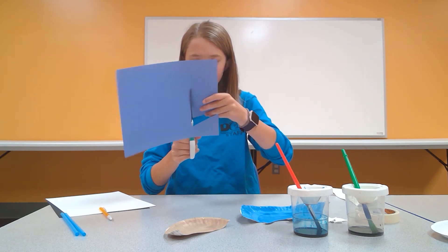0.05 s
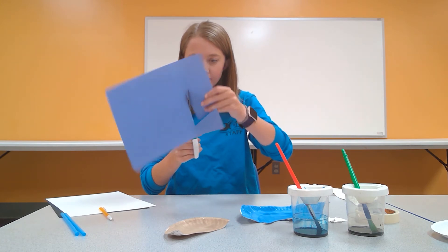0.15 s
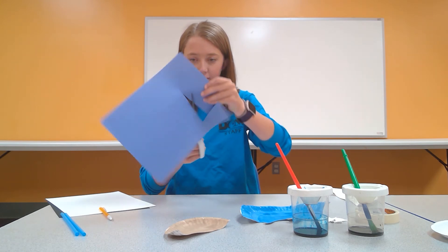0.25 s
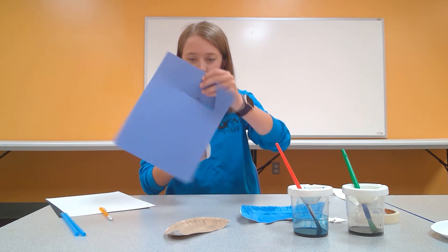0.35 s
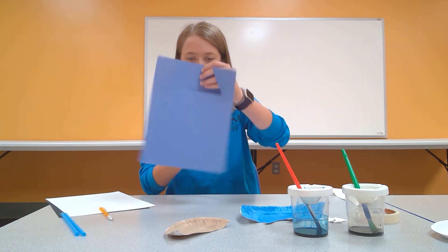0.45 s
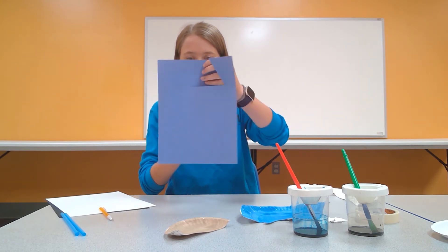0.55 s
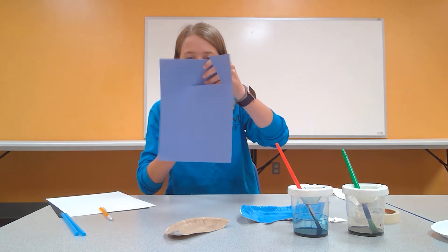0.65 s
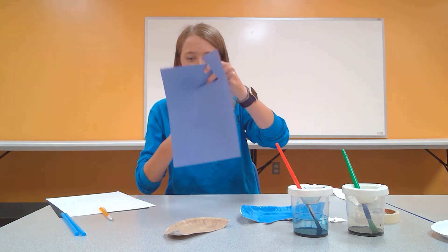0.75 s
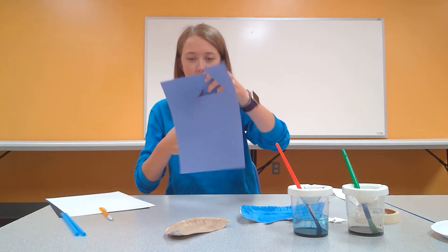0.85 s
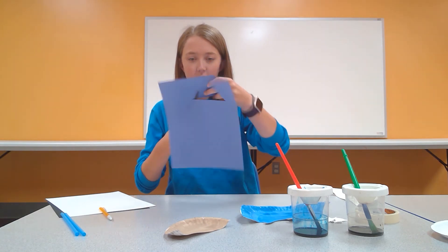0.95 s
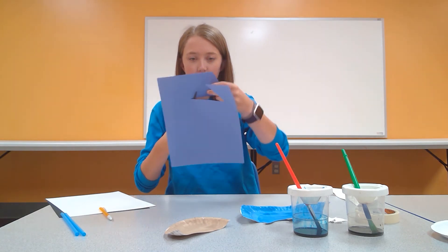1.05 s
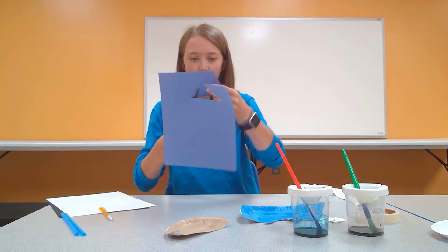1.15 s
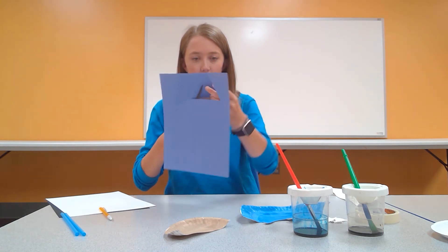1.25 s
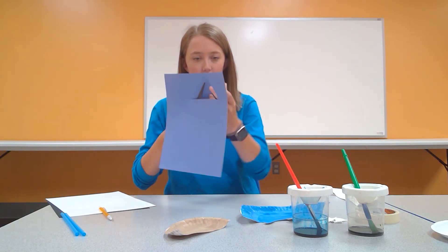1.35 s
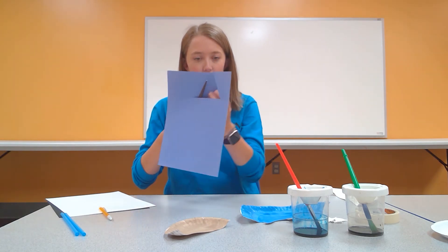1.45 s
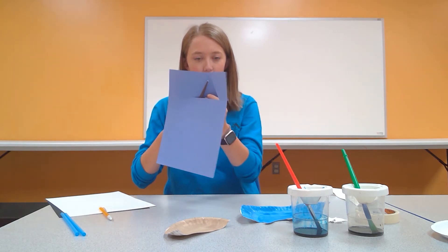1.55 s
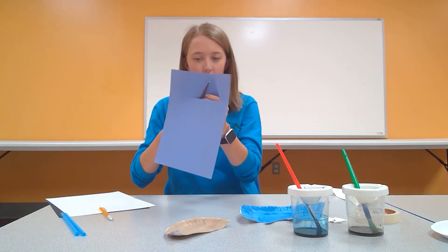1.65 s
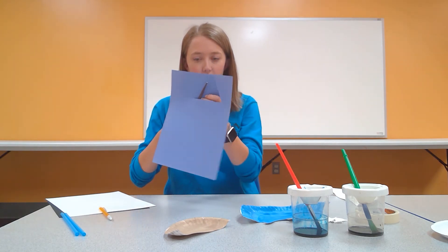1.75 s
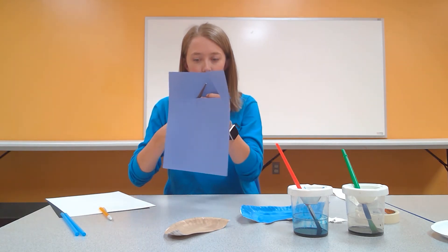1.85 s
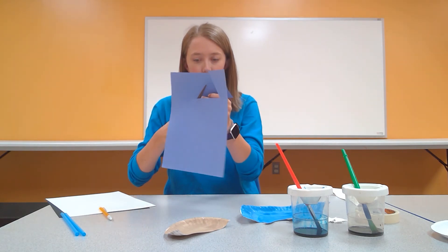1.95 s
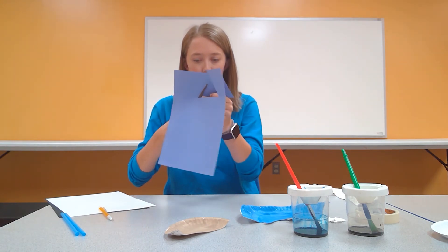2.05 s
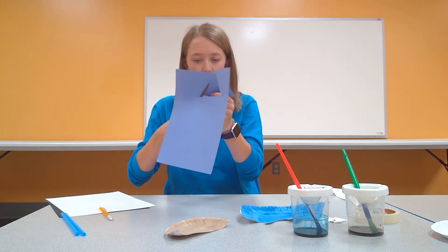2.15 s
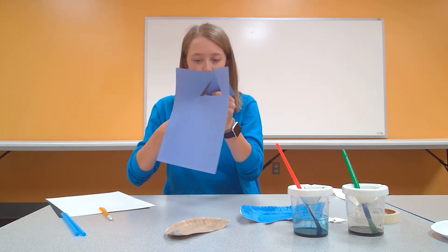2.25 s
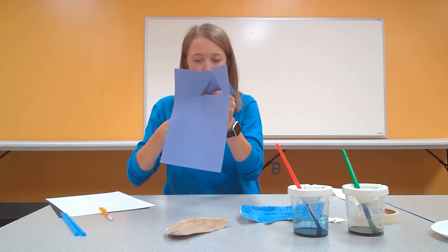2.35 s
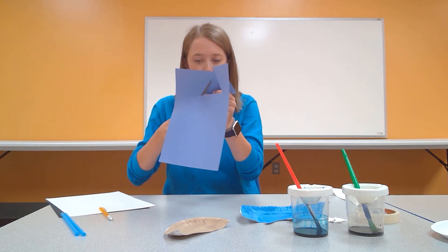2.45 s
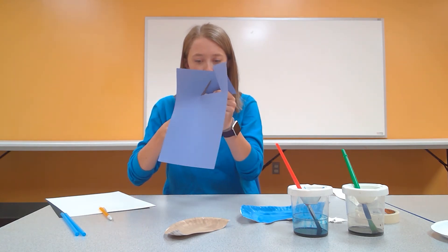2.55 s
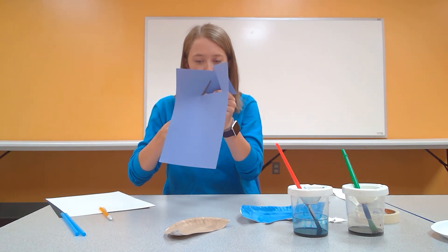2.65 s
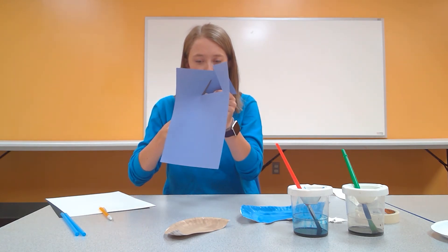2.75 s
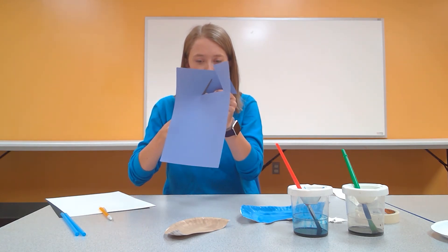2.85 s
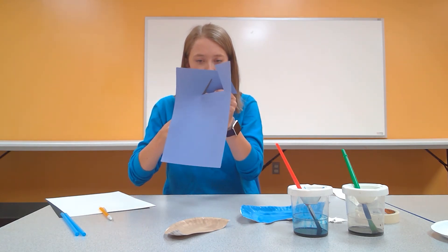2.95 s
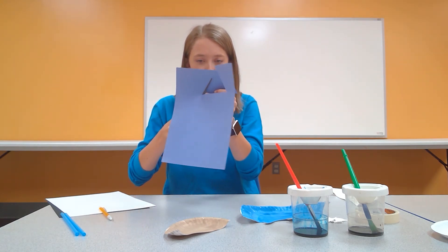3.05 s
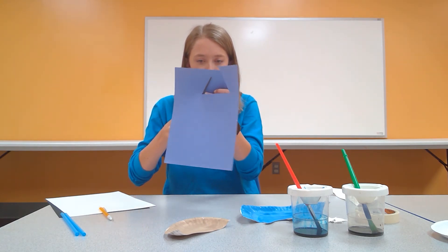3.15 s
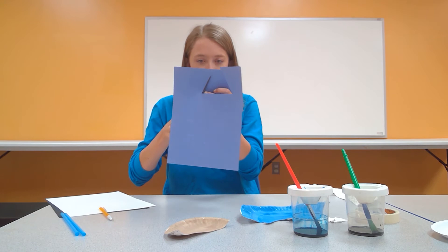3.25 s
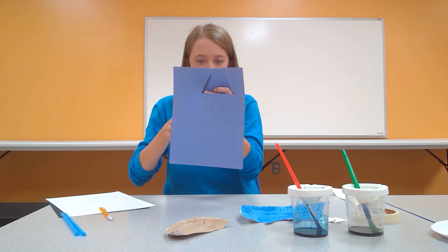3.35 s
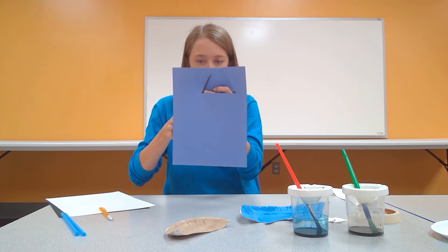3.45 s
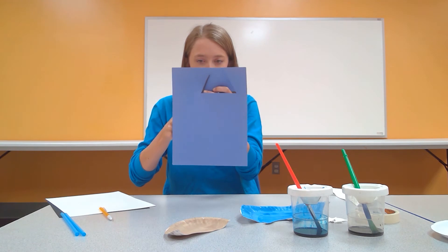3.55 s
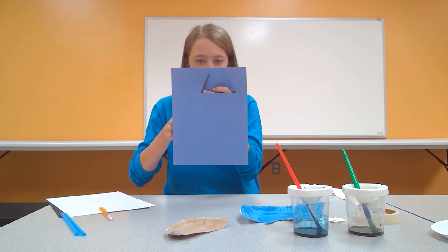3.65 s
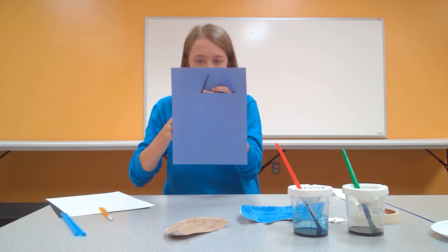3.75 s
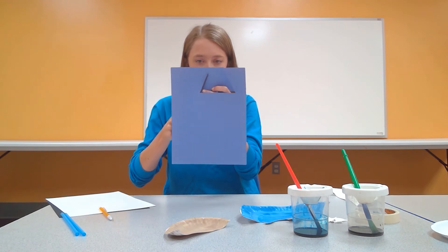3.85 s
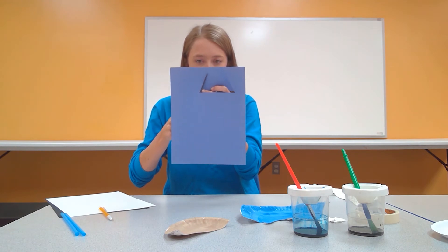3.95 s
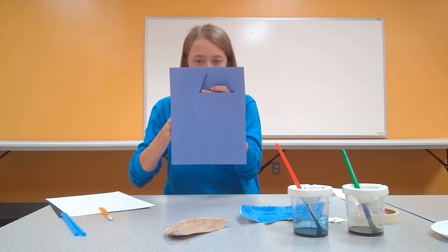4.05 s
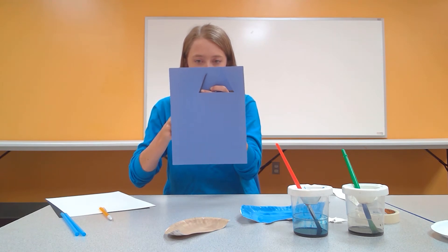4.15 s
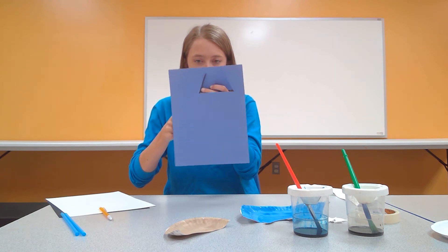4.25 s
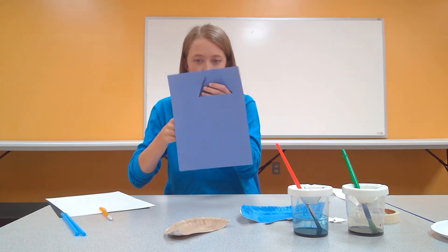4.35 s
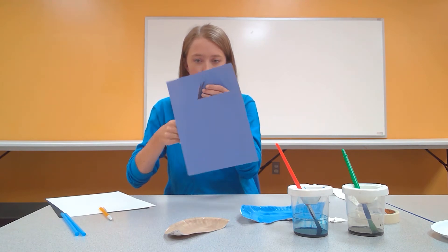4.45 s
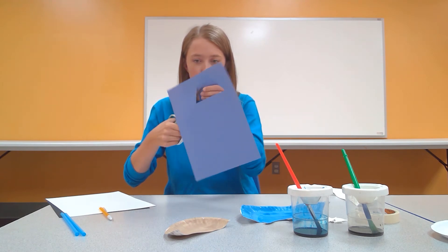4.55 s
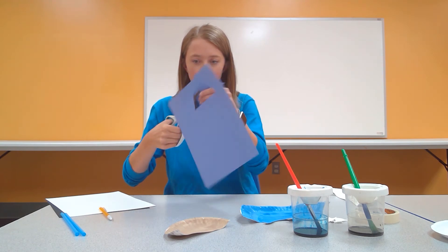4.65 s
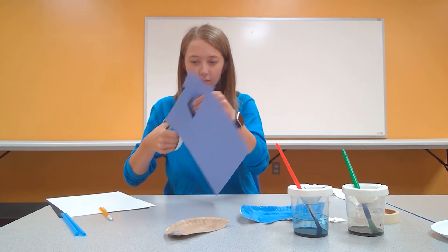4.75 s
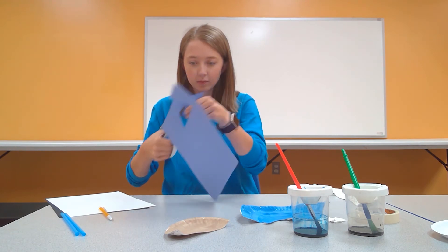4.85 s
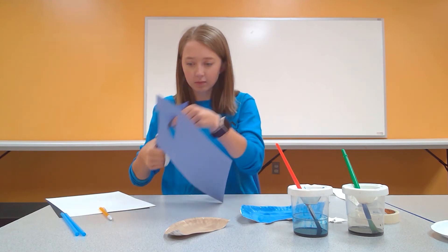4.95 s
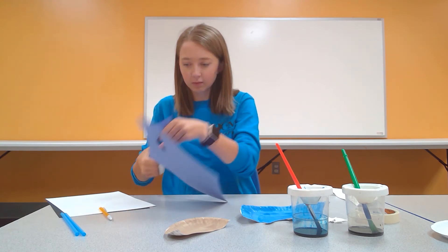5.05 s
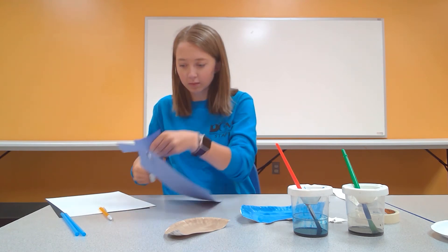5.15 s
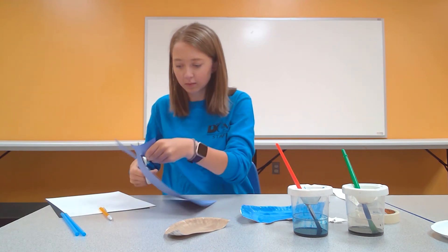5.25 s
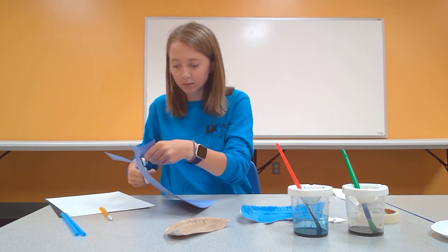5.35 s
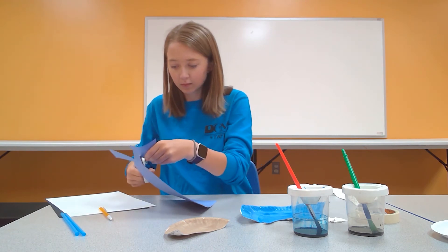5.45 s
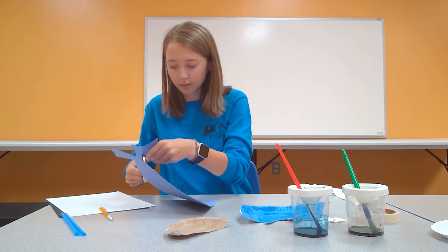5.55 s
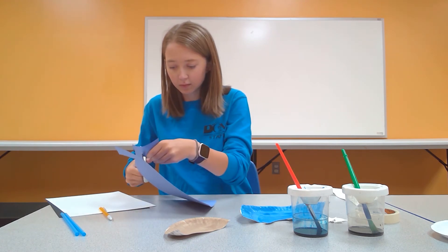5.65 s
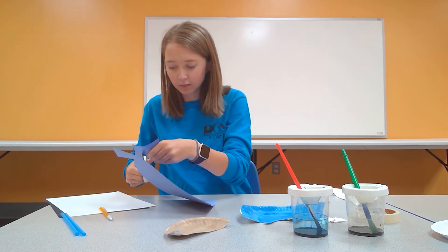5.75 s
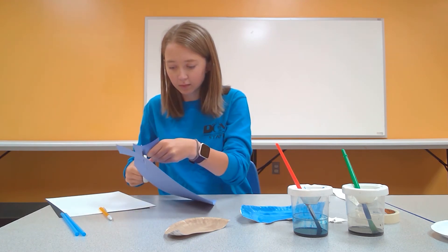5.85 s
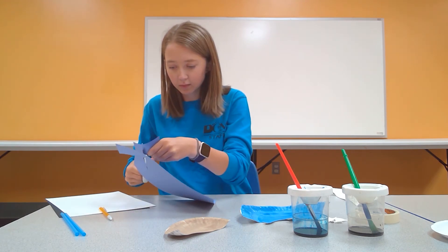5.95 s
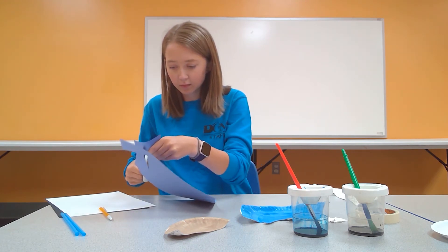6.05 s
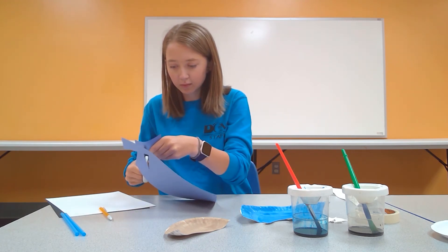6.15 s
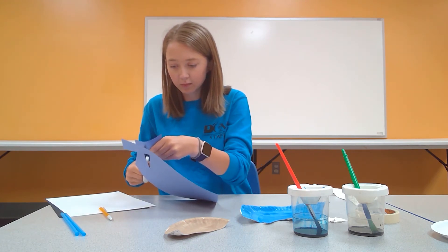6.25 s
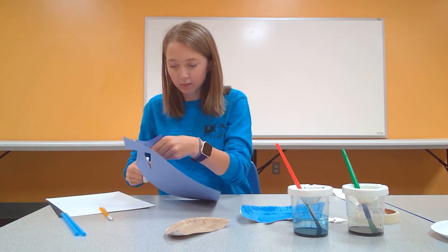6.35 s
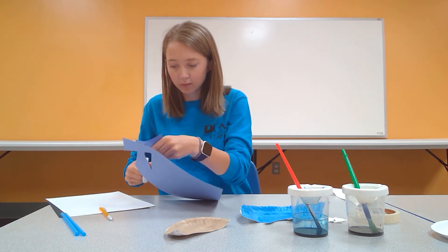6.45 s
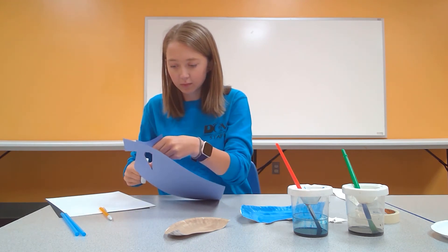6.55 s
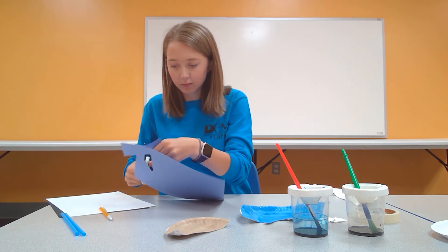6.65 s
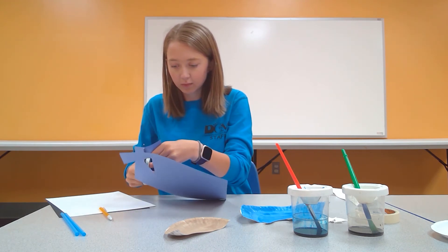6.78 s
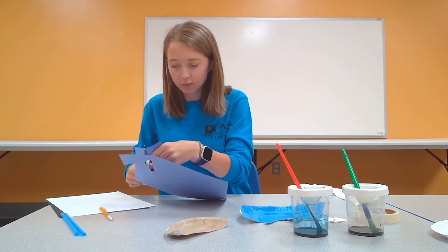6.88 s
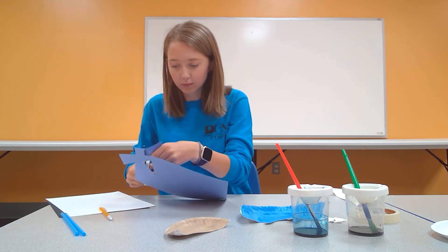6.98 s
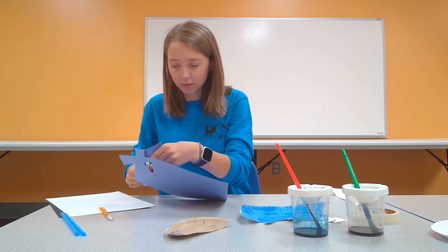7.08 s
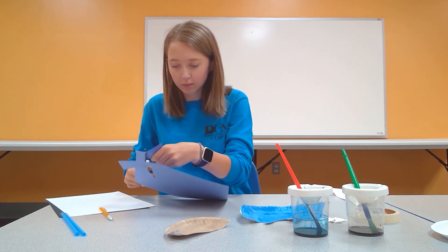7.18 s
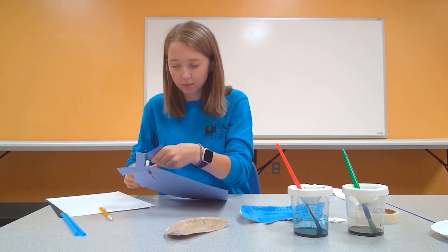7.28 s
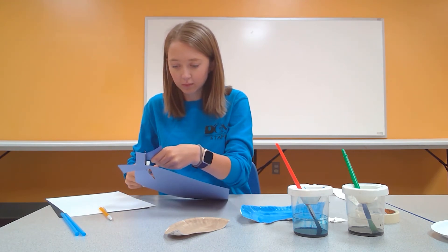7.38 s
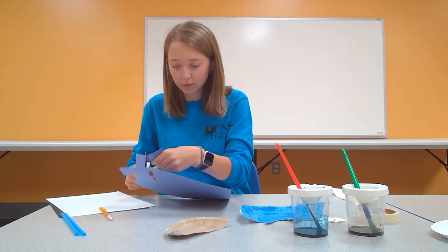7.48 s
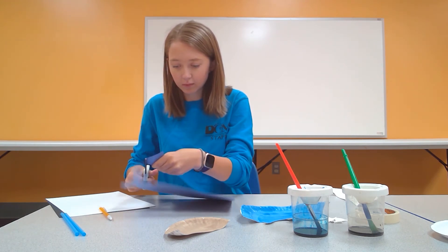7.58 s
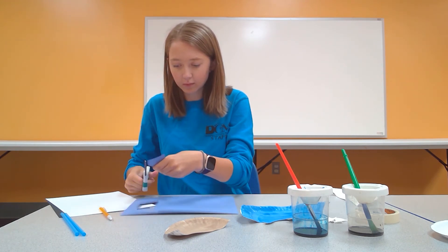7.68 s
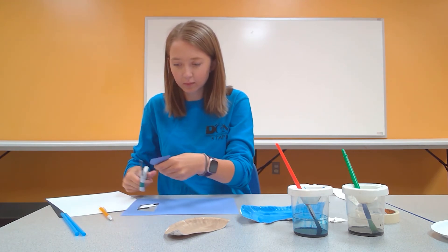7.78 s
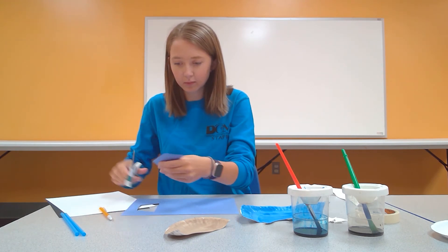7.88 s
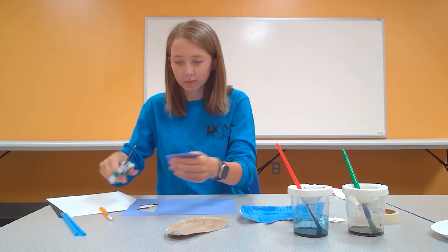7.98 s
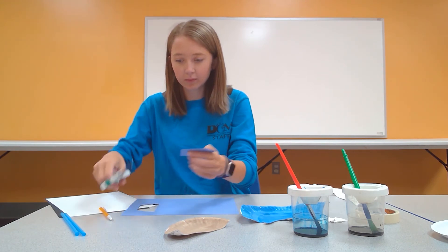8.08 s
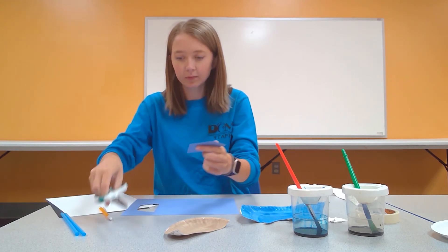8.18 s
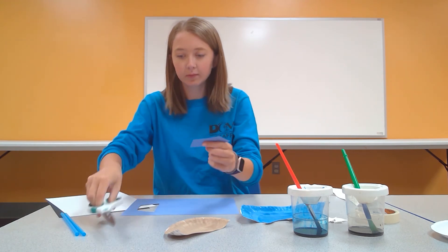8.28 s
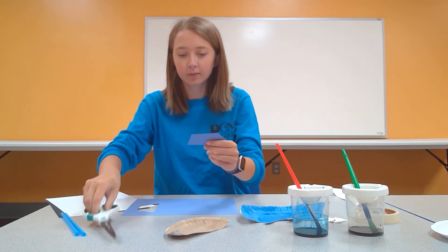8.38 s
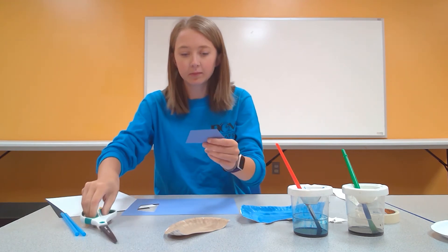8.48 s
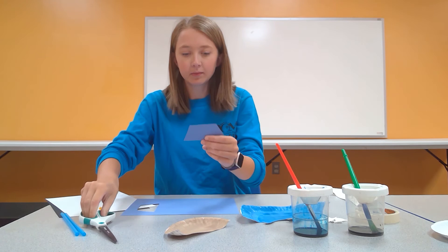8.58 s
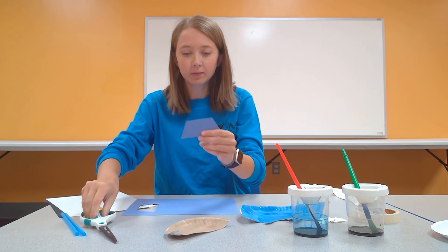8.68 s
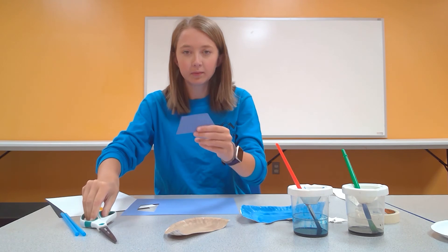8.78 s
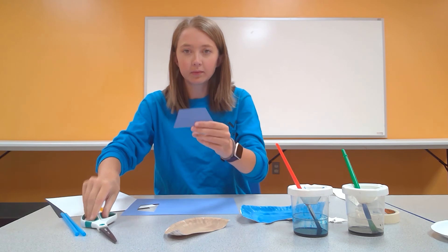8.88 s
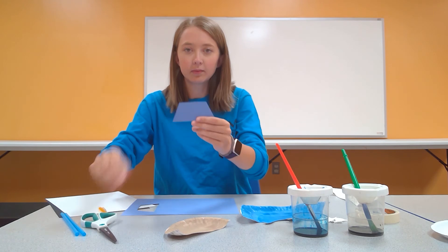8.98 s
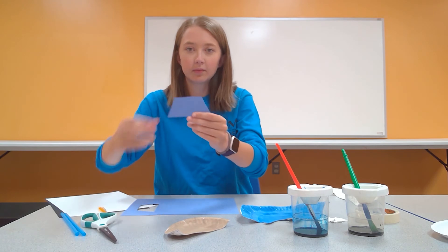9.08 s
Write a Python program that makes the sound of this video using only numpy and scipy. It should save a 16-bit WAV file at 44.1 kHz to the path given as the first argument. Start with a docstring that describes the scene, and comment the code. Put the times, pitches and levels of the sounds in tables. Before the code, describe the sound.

Close, dry handling of a stiff sheet of paper in a bare classroom. Loud pops and rustles as the sheet is turned, then a quieter pause, a run of rapid small scissor bites, a few rubs, a denser second cutting burst with sharp cracks, and sparse clicks. Scissors finally land on the table with thuds and a brief metallic ring. Low room rumble swells with the handling and drops away between.

```python
"""Scissors in a stiff sheet

Scissors work through a stiff sheet in a bare classroom: bursts of friction noise slide and flap, and short
filtered puffs crack, bite and click. A faint brush follows, then the scissors land and ring the table's modes.
A noise suppressor opens the room's low rumble with the loudness of the handling; a weak noise floor stays.
Two close microphone ports hear it all, the left one brighter and a little earlier.
"""
import sys
import numpy as np
from scipy import signal
from scipy.fft import rfft, irfft, next_fast_len
from scipy.io import wavfile
from scipy.ndimage import uniform_filter1d

SR = 44100
rng = np.random.default_rng(int(sys.argv[2]) if len(sys.argv) > 2 else 0)


def waveform_to_disk(signal):
    """Save audio, clipped to [-1, 1], as 16-bit WAV at the path in sys.argv[1]."""
    frames = np.transpose(np.atleast_2d(signal))
    scaled = np.clip(frames, -1, 1) * 32767
    samples = np.round(scaled).astype(np.int16)
    wavfile.write(sys.argv[1], SR, samples)


N = 402191


def amp(db):
    """Level law: 20 dB is a factor of ten in amplitude."""
    return 10 ** (np.asarray(db) / 20)


def evened(x):
    """Normalization to an rms of 1."""
    return x / np.sqrt(np.mean(x ** 2) + 1e-20)


def read(points, hz):
    """Interpolation of a spectrum on a log-frequency axis."""
    f, value = np.transpose(points)
    return np.interp(np.log(hz + 1), np.log(f + 1), value)


def add(mix, s, sound):
    """Superposition of a sound on the mix from s seconds on."""
    part = mix[round(s * SR):][:len(sound)]
    part += sound[:len(part)]


# coherence of the two channels of diffuse noise: (f/Hz, likeness from 0 to 1)
COHERENCE = [(60, .99), (200, .96), (500, .8), (1500, .5), (5000, .3), (14000, .2)]


def noise(colour, size, patchy_db):
    """Partial coherence: two partly alike channels of coloured noise, rms 1, whose narrow bands swell and fade."""
    hop, hz = size // 4, np.fft.rfftfreq(size, 1 / SR)
    a, b, c, d, patches = rng.standard_normal((N // hop + 5, len(hz), 5)).T
    patches = uniform_filter1d(patches, size=3, axis=0)
    patches = evened(uniform_filter1d(patches, size=40, axis=1))
    same = np.clip(read(COHERENCE, hz), -1, 1)[:, None]
    left = a + 1j * b
    right = same * left + np.sqrt(1 - same ** 2) * (c + 1j * d)
    skirted = [(colour[0][0] / 2, -80)] + colour + [(colour[-1][0] * 1.4, -80)]
    level_db = read(skirted, hz)[:, None] + patchy_db * patches
    spectra = np.array([left, right]) * amp(level_db)
    return evened(signal.istft(spectra, nperseg=size, noverlap=size - hop)[1][:, :N])


def burst(length):
    """Impulsive excitation: a puff of noise that swells and dies, with a time scale in s."""
    u = np.arange(2048) / SR / length
    return u ** 2 * np.exp(-u) * rng.standard_normal(2048)


def band(x, lo_hz, hi_hz):
    """Band-pass filtering with the peak brought to 1."""
    sos = signal.butter(4, [lo_hz, hi_hz], "bandpass", fs=SR, output="sos")
    y = signal.sosfilt(sos, x)
    return y / abs(y).max()


def resonate(x, hz, width_hz):
    """Moving resonance by heterodyning: shifts the curve hz down to zero, smooths, and shifts back."""
    turn = np.exp(2j * np.pi * np.cumsum(hz) / SR)
    r = np.exp(-np.pi * width_hz / SR)
    return 2 * (turn * signal.lfilter([1 - r], [1, -r], x / turn)).real


# loudness threshold in dB; opening in dB of gain per dB of loudness over it; gain range in dB
THRESHOLD_DB, OPENING, DEPTH_DB = -83, 0.64, 28.5
HELD_FALL_DB_PER_S = 154.5  # steady fall of the held loudness
GAIN_SMOOTHING_S = 0.016


def suppressor(handling):
    """Downward expansion: a gain for the rumble that follows the held loudness of the handling."""
    power = abs(uniform_filter1d((handling ** 2).mean(0), size=441))
    power_db = 10 * np.log10(power + 1e-14)
    fall = np.arange(N) * HELD_FALL_DB_PER_S / SR
    held_db = np.maximum.accumulate(power_db + fall) - fall
    open_db = np.clip(OPENING * (held_db - THRESHOLD_DB), 0, DEPTH_DB)
    r = np.exp(-1 / (GAIN_SMOOTHING_S * SR))
    return amp(signal.lfilter([1 - r], [1, -r], open_db) - DEPTH_DB)


# uneven level of the room rumble with the suppressor fully open: (t/s, level/dB)
RUMBLE_LEVEL = [(0.0, -45.5), (0.5, -40.5), (1.0, -37), (1.399, -35.5), (1.897, -43), (2.6, -41.5),
                (3.0, -40), (3.5, -36), (3.899, -44.5), (4.4, -40), (4.699, -54), (4.95, -37.5),
                (5.299, -45), (6.1, -45.5), (6.8, -44.5), (7.1, -48), (7.599, -51.5), (8.5, -42),
                (8.85, -46), (9.1, -32.5)]
# spectral density of the rumble: (f/Hz, level/dB per Hz)
RUMBLE_COLOUR = [(9, -30), (15, 3), (34, -2), (76, -9.5), (107, -6), (145, -13.5), (240, -17), (400, -30),
                 (700, -35.5), (1000, -35), (1300, -61)]
LEAK_DB = -73  # steady rumble that bypasses the gate


def rumble(gate):
    """Amplitude modulation: unevenly swelling low room noise passes the gate, and a trace always leaks."""
    s, db = np.transpose(RUMBLE_LEVEL)
    swelling = amp(np.interp(np.arange(N) / SR, s, db))
    return (gate * swelling + amp(LEAK_DB)) * noise(RUMBLE_COLOUR, size=2048, patchy_db=2.5)


# spectral density of the steady background: (f/Hz, level/dB per Hz)
FLOOR = [(150, -45.5), (250, -1.5), (319, -26), (1220, -23.5), (3060, -23), (3230, -27), (5930, -29.5),
         (7190, -32), (9660, -35.5), (12300, -19), (16000, -57)]
FLOOR_DB = -86


def noise_floor():
    """Stationary noise: a weak broad background."""
    return amp(FLOOR_DB) * noise(FLOOR, size=1024, patchy_db=3.0)


# resonances of the blades gripping the sheet: (f/Hz, width/Hz, level/dB)
GRIP = [(2110, 440, 5), (2802, 539, 8), (3314, 380, 1.5), (3752, 400, -5), (4320, 280, -5)]


def gripped(x):
    """Forced resonance: short, steep blade modes, shifted and shared out anew by each crack."""
    share_db, shift = rng.standard_normal((2, len(GRIP)))
    y = 0
    for (hz, width, db), share, e in zip(GRIP, share_db, shift):
        peak = signal.tf2sos(*signal.iirpeak(hz * np.exp(0.048 * e), hz / width, SR))
        y = y + amp(db + 3 * share) * signal.sosfilt(np.vstack([peak, peak]), x)  # twice, for steep flanks
    return band(y, 1600, 5200)


def crack(sheet_db, hz, edge_db, spray_db, grip_db, top_db, top_hz, length):
    """Impulsive resonance: a burst shakes the sheet at its momentary tone, rings the blades and sprays treble."""
    x = burst(length * rng.uniform(.6, 1.4))
    sheet = band(x, 0.523 * hz, 1.304 * hz) + 0.56 * band(x, 0.868 * hz, 1.083 * hz)
    snap = band(x, 1500, 4080)
    edge = (snap + amp(grip_db) * gripped(x)) / (1 + amp(grip_db))
    spray = band(x, 4400, 7600) + amp(top_db) * band(x, 7200, top_hz)
    return amp(sheet_db) * sheet / 2 + amp(edge_db) * edge + amp(spray_db) * spray


# cracks of the sheet as it bends or parts:
# (t/s, sheet level/dB, sheet tone f/Hz, edge level/dB, treble spray level/dB)
CRACKS = [(0.051, -26, 913, -31, -46), (0.064, -28.5, 814, -38.5, -56), (0.069, -32.5, 884, -35.5, -52.5),
          (0.24, -17, 768, -48.5, -65.5), (0.25, -28, 766, -56, -69.5), (0.368, -51, 600, -47, -53),
          (0.417, -27, 725, -52, -81), (0.506, -33.5, 745, -35, -43), (0.566, -31, 806, -60, -61.5),
          (0.66, -48, 940, -32.5, -43.5), (0.698, -56, 1100, -38, -58), (0.798, -44, 1140, -52, -58),
          (0.884, -58, 1270, -38, -46.5), (1.059, -44.5, 1080, -75, -75), (1.239, -37.5, 926, -48, -82),
          (1.296, -34, 529, -38.5, -45.5), (1.343, -31.5, 770, -42, -58), (1.687, -46.5, 900, -62, -91),
          (1.766, -63, 1010, -48, -61), (4.608, -74, 1200, -56.5, -53.5), (4.755, -41, 1360, -39.5, -71.5),
          (5.221, -54, 1410, -62, -72), (5.259, -30, 1550, -67, -57.5), (5.645, -67, 1310, -76, -96),
          (6.379, -27, 808, -34.5, -46.5), (6.422, -34, 798, -35, -47), (6.611, -46, 1080, -63, -81),
          (6.7, -28.5, 920, -44, -50), (0.081, -36.5, 795, -47, -58.5), (0.969, -48, 1060, -61, -76),
          (6.791, -21, 1346, -34, -40.5), (7.396, -35, 1240, -40, -47.5), (7.436, -61.5, 1184, -66.5, -73),
          (7.528, -38, 1068, -32.5, -45.5), (7.601, -35.5, 837, -26, -32)]
# small bites of the blades along a cut, and, from 7 s on, light clicks of the blades:
# (t/s, sheet level/dB, sheet tone f/Hz, edge level/dB, treble spray level/dB)
BITES = [(2.981, -32, 460, -36.5, -59.5), (3.008, -55, 600, -41, -63), (3.036, -39.5, 820, -35, -56.5),
         (3.068, -57, 600, -47, -66), (3.106, -37, 600, -39, -69), (3.133, -69, 690, -54, -74),
         (3.178, -36.5, 887, -38.5, -71), (3.208, -48, 600, -48, -72), (3.265, -38, 600, -41.5, -72),
         (3.295, -41, 600, -46, -73), (3.326, -66, 600, -56, -78), (3.354, -33.5, 1027, -39.5, -60),
         (3.385, -48, 720, -36.5, -61), (3.407, -44, 1110, -54, -69), (3.443, -35, 1140, -33, -61),
         (3.475, -39, 1020, -45, -67), (3.511, -45, 1130, -71, -77), (3.545, -41.5, 1034, -51.5, -82),
         (3.588, -49.5, 880, -55, -87), (3.625, -51, 930, -61, -84), (3.652, -59, 900, -61, -95),
         (3.706, -39.5, 870, -57, -78), (3.733, -43.5, 1050, -55.5, -78), (3.808, -43, 1095, -51.5, -77),
         (3.832, -40, 1050, -52, -78), (3.861, -42.5, 876, -43, -69), (3.887, -39.5, 816, -46.5, -70),
         (3.915, -46.5, 820, -72, -66), (3.948, -42, 893, -45.5, -72), (3.975, -53.5, 825, -51.5, -79),
         (4.005, -55, 860, -79, -84), (4.099, -52.5, 810, -67.5, -84), (4.294, -52.5, 1120, -58, -81),
         (5.988, -47.5, 960, -71, -81), (6.016, -30, 970, -43.5, -63), (6.033, -28.5, 856, -39.5, -57),
         (6.058, -35, 920, -47.5, -62), (6.102, -31, 960, -54, -58.5), (6.149, -31.5, 875, -44.5, -65),
         (6.168, -53, 900, -63, -81), (6.208, -33, 670, -62, -77), (6.224, -32.5, 660, -47.5, -69),
         (6.252, -34, 750, -40.5, -63), (6.272, -34, 783, -48, -65), (6.313, -28, 586, -48.5, -61),
         (7.029, -43, 1260, -67, -76), (7.044, -57, 920, -57, -65.5), (7.073, -41.5, 1340, -47, -59.5),
         (7.353, -48, 1300, -50.5, -71), (7.377, -52, 1150, -53, -81)]
# thin dry ticks of a crease snapping over: (t/s, peak level/dB)
TICKS = [(0.2165, -48), (0.636, -52), (0.6996, -39.5), (4.8625, -64), (6.721, -42), (6.7393, -51),
         (6.7964, -40.5)]
CRACK_S, BITE_S, TICK_S = 0.0013, 0.0016, 0.0003  # middle time scales of the bursts
CRACK_GRIP_DB, BITE_GRIP_DB = -6, 7  # blade resonances over the plain snap
CRACK_TOP_DB, BITE_TOP_DB = -12, -12  # top of the spray relative to its lower part
CRACK_TOP_HZ, BITE_TOP_HZ = 16000, 12500  # upper edge of the spray


def cracks():
    """Impulsive radiation: bright cracks of the sheet, ringing bites and clicks of the blades, ticks of creases."""
    out = np.zeros(N)
    for s, *row in CRACKS:
        add(out, s - CRACK_S / 2, crack(*row, CRACK_GRIP_DB, CRACK_TOP_DB, CRACK_TOP_HZ, CRACK_S))
    for s, *row in BITES:
        add(out, s - BITE_S, crack(*row, BITE_GRIP_DB, BITE_TOP_DB, BITE_TOP_HZ, BITE_S))
    for s, db in TICKS:
        add(out, s - TICK_S, amp(db) * band(burst(TICK_S), 1800, 8000))
    return out


# single fibres popping under a stroke: rate, least level, mean excess level, decay time
CRINKLES_PER_S, CRINKLE_DB, CRINKLE_SPREAD_DB, CRINKLE_S = 220, -9, 5, 0.003


def crinkles():
    """Shot noise: level bumps of a few ms at random moments, a few of them large."""
    struck = rng.random(N) < CRINKLES_PER_S / SR
    pops = struck * amp(CRINKLE_DB + CRINKLE_SPREAD_DB * np.minimum(rng.exponential(1, N), 3))
    return evened(1 + signal.lfilter([1], [1, -np.exp(-1 / (CRINKLE_S * SR))], pops))


# paper strokes over fingers, blades and table:
# (start t/s, end t/s, flap level/dB, rub level/dB, scrape level/dB, scrape tone f/Hz,
#  hiss level/dB, air level/dB, change of pressure/dB per s)
STROKES = [(0.084, 0.197, -62.5, -57, -59, 2324, -67, -75.5, 8),
           (0.212, 0.366, -50.5, -53, -53.5, 3410, -56, -66, 13),
           (0.368, 0.401, -52, -69, -58.5, 3000, -77, -69, -40),
           (0.403, 0.47, -43, -57, -76, 2900, -90, -93, -34),
           (0.494, 0.536, -48.5, -51.5, -52.5, 3725, -58.5, -71, -22),
           (0.553, 0.622, -44, -52, -59, 3010, -61, -75, -37),
           (0.639, 0.783, -52, -48.5, -54, 2460, -58, -72, -52),
           (0.783, 0.807, -76, -60, -53.5, 3400, -54, -70, 5),
           (0.811, 0.922, -85, -72.5, -58.5, 2975, -64, -73, 8),
           (0.933, 1.042, -49, -63, -60, 2590, -70, -82, -55),
           (1.051, 1.113, -49.5, -66.5, -68.5, 4400, -72, -91, 2),
           (1.119, 1.29, -55.5, -58.5, -58, 3010, -70.5, -92, -16),
           (1.292, 1.358, -48, -52, -58.5, 2770, -65, -65, -22),
           (1.685, 1.766, -73, -76, -70.5, 3040, -96, -111, -25.5),
           (1.754, 1.809, -74, -55.5, -54.5, 2863, -60.5, -64.5, -20),
           (1.814, 2.027, -53.5, -54.5, -58, 3010, -71, -90, -28),
           (2.253, 2.327, -65.5, -81, -75.5, 3100, -100.5, -99, -19.5),
           (2.594, 2.637, -78.5, -87, -83, 2800, -99, -105, -18),
           (2.836, 2.853, -66.5, -88, -96, 2350, -105, -110, -22),
           (2.973, 3.126, -51.5, -58.5, -64.5, 2915, -81, -98, -24),
           (3.13, 3.39, -55.5, -72.5, -83, 3210, -100, -105, -8),
           (3.343, 3.515, -58.5, -60.5, -75, 3225, -90, -91, -26),
           (3.687, 3.973, -63, -88, -84, 2723, -100, -110, -16),
           (4.292, 4.47, -73, -83.5, -70, 2970, -84, -100, -77.5),
           (4.474, 4.607, -74, -86, -66, 3550, -84.5, -100, -32),
           (4.497, 4.595, -91, -93, -70, 2170, -105, -110, -40),
           (4.607, 4.75, -67.5, -58.5, -48, 3363, -57, -70, -25),
           (4.759, 4.89, -93, -80, -64, 3230, -91, -98, -60),
           (4.871, 5.025, -53, -68.5, -65, 3900, -78.5, -95, -14),
           (4.951, 5.045, -77, -77, -66.5, 1720, -98, -105, -22),
           (5.235, 5.294, -83, -51.5, -54, 1977, -73, -92.5, -13),
           (5.637, 5.866, -84, -73, -77.5, 1970, -99, -108, -15),
           (6.004, 6.18, -57.5, -55.5, -67.5, 2195, -81, -89, -21),
           (6.197, 6.352, -58, -56, -73, 2200, -83, -94, -28),
           (6.375, 6.449, -49, -55, -59.5, 2037, -66, -70, -22),
           (6.603, 6.71, -56.5, -49.5, -53.5, 1660, -60.5, -75.5, -5),
           (6.692, 6.803, -50.5, -57, -60.5, 2733, -70, -77, -44),
           (6.789, 6.863, -55.5, -47.5, -53.5, 2263, -70, -77, -37),
           (7.071, 7.207, -78, -81, -74, 1793, -100, -104, -11),
           (7.403, 7.45, -70, -62, -61.5, 2073, -81, -82, -22),
           (7.521, 7.624, -63.5, -63.5, -63, 1856, -68, -73, -24),
           (7.597, 7.666, -55.5, -59.5, -47.5, 3900, -57, -62.5, -28),
           (8.803, 8.89, -73, -52, -59, 2000, -65, -74, -22),
           (8.872, 9.024, -68, -43.5, -55, 1756, -74, -95, -36)]
# spectral densities of the five friction noises, low to high: (f/Hz, level/dB per Hz)
FLAP = [(120, -5), (220, 6), (340, 7.5), (520, 1), (750, -33.5)]
RUB = [(520, -16), (750, 3.5), (1200, 4), (1500, -11), (1750, 0.5)]
SCRAPE = [(1500, -18.5), (2000, 1.5), (2500, 2.5), (3200, 1.5), (4300, -1.5), (5100, -14)]
HISS = [(4300, -0.5), (5200, -1), (6600, -1), (7600, -11), (8500, -24.5)]
AIR = [(7800, -5.5), (8800, -3.5), (10000, -0.5), (11500, -18), (13500, -10), (15800, -10.5)]
STROKE_RISE_S, STROKE_EDGE_S = 0.006, 0.014  # strokes set in and let go within these times
WANDER, CATCH_DB = 0.035, 1.5  # rms drift of the scrape tone (fraction), rms depth of the catches
FIRM_DB, FOCUS = -58, 0.9  # scraping lighter than this keeps its tone and loses wash, dB per dB
SPAN_DB = -2.5  # tone of the span against the level of the scrape
SPAN_FIRM_HZ, SPAN_LIGHT_HZ = 1050, 550  # resonator width under firm and the lightest pressure


def slide():
    """Sliding friction: noise in five bands, plus the tone of the free span of paper beside the contact."""
    flap, rub, scrape, hiss, air = (noise(colour, size=256, patchy_db=2.8)
                                    for colour in (FLAP, RUB, SCRAPE, HISS, AIR))
    wander = uniform_filter1d(uniform_filter1d(rng.standard_normal(N), size=900), size=900)
    drift = np.exp(WANDER * evened(wander))
    gains, span = np.zeros((5, N)), np.zeros((2, N))
    for start, end, flap_db, rub_db, scrape_db, hz, hiss_db, air_db, drift_db in STROKES:
        on = slice(round(start * SR), round((end + STROKE_EDGE_S) * SR))
        t = np.arange(on.stop - on.start) / SR
        fade = np.clip(np.minimum(t / STROKE_RISE_S, (t[-1] - t) / STROKE_EDGE_S), 0, 1)
        press = amp(drift_db * t) * fade
        light_db = max(FIRM_DB - scrape_db, 0)
        wash_db = scrape_db - 4 - FOCUS * light_db
        gains[:, on] += amp([flap_db, rub_db, wash_db, hiss_db, air_db])[:, None] * press
        # lighter pressure gives a narrower tone
        width_hz = SPAN_LIGHT_HZ + (SPAN_FIRM_HZ - SPAN_LIGHT_HZ) * amp(-2 * light_db)
        tone_hz = hz * drift[on]
        tone = resonate(resonate(scrape[:, on], tone_hz, width_hz), tone_hz, width_hz)
        span[:, on] += amp(scrape_db + SPAN_DB) * press * evened(tone)
    catches = amp(CATCH_DB * evened(uniform_filter1d(rng.standard_normal(N), size=300)))
    body = gains[1] * rub + gains[2] * scrape + span
    treble = gains[3] * hiss + gains[4] * air
    return catches * (gains[0] * flap + crinkles() * body + crinkles() * treble)


# spectral density of the faint airy brush just before the landing: (f/Hz, level/dB per Hz)
BRUSH_COLOUR = [(2060, -44), (3500, -13.5), (4870, 1), (5290, -1.5), (7750, -20.5), (9500, 4), (11000, -9),
                (11700, -10), (14500, -3.5), (16000, -9)]
BRUSH_START_S, BRUSH_END_S, BRUSH_DB = 8.285, 8.43, -70.5


def brush():
    """Friction noise: a short, faint puff, mostly high."""
    t = np.arange(N) / SR
    shape = np.clip(np.minimum(t - BRUSH_START_S, BRUSH_END_S - t) / 0.05, 0, 1)
    return amp(BRUSH_DB) * shape * noise(BRUSH_COLOUR, size=256, patchy_db=6.0)


CHATTER, CHATTER_S = 1.6, 0.004  # flutter of loose contact with the table: rms depth, time step


def ring(modes):
    """Modal decay: the modes mix slightly anew at each contact, each fluttering as it dies."""
    share_db = 1.5 * rng.standard_normal(len(modes))
    t = np.arange(SR // 2) / SR
    knots = np.arange(0, t[-1] + CHATTER_S, CHATTER_S)
    flutter = rng.standard_normal((2, len(modes), len(knots))) * CHATTER * (knots > 0)
    out = np.zeros(len(t))
    for (hz, db, t60), share, p, q in zip(modes, share_db, *flutter):
        phase = 2 * np.pi * hz * t
        wave = (1 + np.interp(t, knots, p)) * np.sin(phase) + np.interp(t, knots, q) * np.cos(phase)
        out += amp(db + share - 60 * t / t60) * wave
    return out


# scissors landing and settling on the table; the last three levels are relative to the thud:
# (t/s, thud peak level/dB, thud tone f/Hz, table ring level/dB, blade ring level/dB, edge level/dB)
KNOCKS = [(8.450, -28.5, 1400, -7, -16.5, 7.5), (8.461, -36, 720, -2.5, -32, -24),
          (8.478, -42, 1470, -13, -18, 11), (8.8, -24, 860, -23.5, -31.5, -7),
          (8.868, -35, 780, -23, -41, -5), (8.882, -28.5, 900, -2.5, -26.5, -2.5),
          (8.892, -29, 740, -5, -54, -5), (8.897, -33, 720, -5, -42, -4), (8.912, -36.5, 590, -5, -47, -20),
          (8.967, -38, 880, -6.5, -45, -25)]
# modes of the table top: (f/Hz, level/dB, t60/s)
TABLE = [(504, -15.5, 0.39), (600, -1.5, 0.053), (730, 5.5, 0.03), (1140, 4.5, 0.012)]
# modes of the blades: (f/Hz, level/dB, t60/s)
BLADES = [(1168, -4, .22), (1362, 1, .3), (1405, -1, .24), (2085, -6, .27), (2145, -5, .3), (3000, -18, .2),
          (3811, -15, .17), (4080, -12, .27), (4180, -11, .3), (5006, -18, .18), (5450, -16, .2),
          (6380, -15, .21), (7730, -22, .17)]


def knocks():
    """Impact excitation: each contact thuds and ticks and sets table top and blades ringing."""
    out = np.zeros(N)
    for s, db, hz, top_db, blade_db, edge_db in KNOCKS:
        x = burst(0.00077)
        thud = band(x, 0.55 * hz, 1.47 * hz)
        tick = band(x, 1300, 3700) + 0.37 * band(x, 2900, 10900)
        add(out, s, amp(db) * (thud + amp(edge_db) * tick))
        add(out, s, amp(db) * (amp(top_db) * ring(TABLE) + amp(blade_db) * ring(BLADES)))
    return out


# scatter off hands, sheet and table: energy over the direct sound, decay time, treble tilt
NEAR_DB, NEAR_S, NEAR_BRIGHT = 3, 0.004, 0.7


def near(x):
    """Early scattering: the direct sound plus a few ms of scatter that differs at the two ports."""
    t = np.arange(1024) / SR
    bright = signal.lfilter([1, -NEAR_BRIGHT], [1], rng.standard_normal((2, len(t))))
    taps = bright * np.exp(-t / NEAR_S) * (t > 0)
    taps = amp(NEAR_DB) * taps / np.linalg.norm(taps, axis=1, keepdims=True) + (t == 0)
    return signal.oaconvolve(x[None], taps, axes=1)[:, :N]


# reverberation time of the classroom: (f/Hz, t60/s)
ROOM = [(250, 0.022), (700, 0.36), (2000, 0.34), (5000, 0.4), (12000, 0.3)]


def room(x):
    """Diffuse reverberation: dense reflections start after a short gap, each band dying at its own speed."""
    tail = noise([(100, 0), (20000, 0)], size=256, patchy_db=0)[:, SR // 2:SR]
    hz, t, z = signal.stft(tail, SR, nperseg=256)
    decay = amp(-60 * t / read(ROOM, hz)[:, None])
    tail = signal.istft(z * decay, SR, nperseg=256)[1]
    tail = tail * np.clip((np.arange(tail.shape[1]) / SR - .005) / .008, 0, 1)  # 5 ms gap, 8 ms rise
    return signal.fftconvolve(x[None], tail / np.linalg.norm(tail[0]), axes=1)[:, :N]


PAPER_ECHO_DB, STROKE_ECHO_DB, KNOCK_ECHO_DB = -10.5, -9.5, -6  # sends to the room


def scene():
    """Superposition of direct sound, reverberation and background; the handling's loudness gates the rumble."""
    paper, strokes, metal = cracks(), slide(), knocks()
    sent = amp(PAPER_ECHO_DB) * paper + amp(KNOCK_ECHO_DB) * metal + amp(STROKE_ECHO_DB) * strokes[0]
    handling = near(paper + metal) + strokes + room(sent)
    return handling + brush() + rumble(suppressor(handling)) + noise_floor()


# treble response of both ports: (f/Hz, level/dB)
PORTS = [(9000, 0), (10800, -2), (12000, -12), (13200, -4), (16000, -3)]
# left port over right port: (f/Hz, level/dB)
LEFT_OVER_RIGHT = [(60, 0.3), (300, 0.6), (620, 6), (2800, 8), (6000, 9.5), (14000, 11)]
RIGHT_LATE = 4  # samples
BAND_LIMIT_HZ = 16200


def record(dry):
    """Linear filtering: the ports dull the treble and differ in level and arrival time; then the band limit."""
    size = next_fast_len(N + SR)
    hz = np.fft.rfftfreq(size, 1 / SR)
    # half of each difference goes to either port
    left = amp(read(LEFT_OVER_RIGHT, hz) / 2) * np.exp(1j * np.pi * hz * RIGHT_LATE / SR)
    spectrum = rfft(dry, size) * amp(read(PORTS, hz))
    ports = irfft(spectrum * np.array([left, 1 / left]), size)[:, :N]
    lowpass = signal.firwin(511, BAND_LIMIT_HZ, window=("kaiser", 9), fs=SR)
    return signal.oaconvolve(ports, lowpass[None], "same")


dry = scene()
out = record(dry)
waveform_to_disk(out)
```